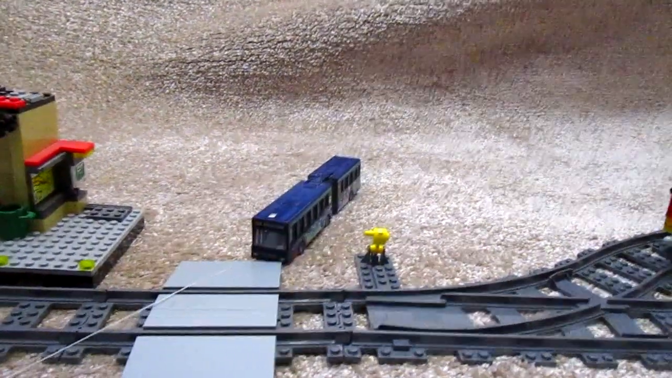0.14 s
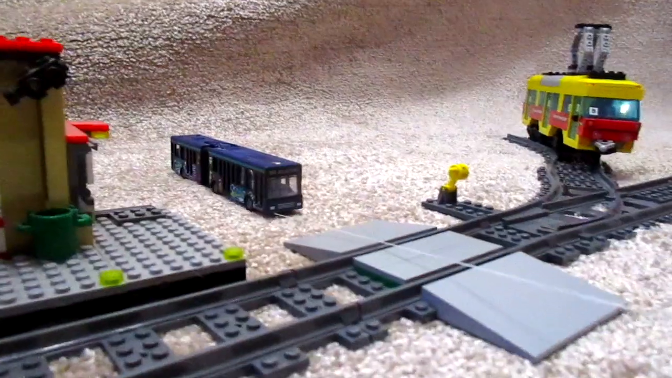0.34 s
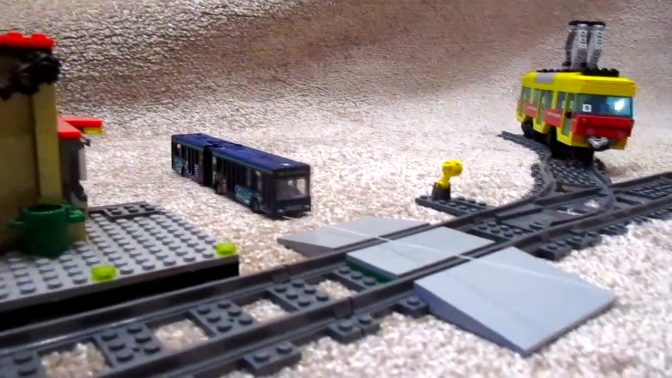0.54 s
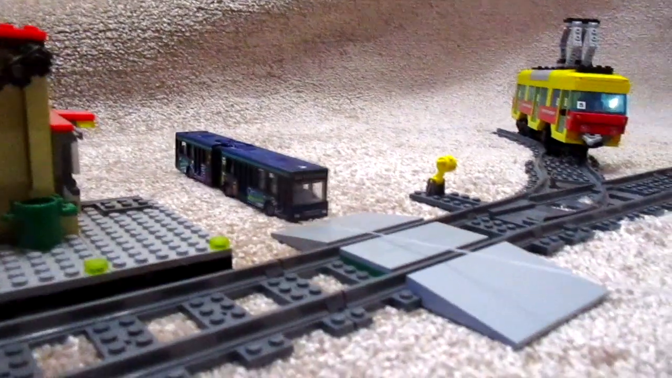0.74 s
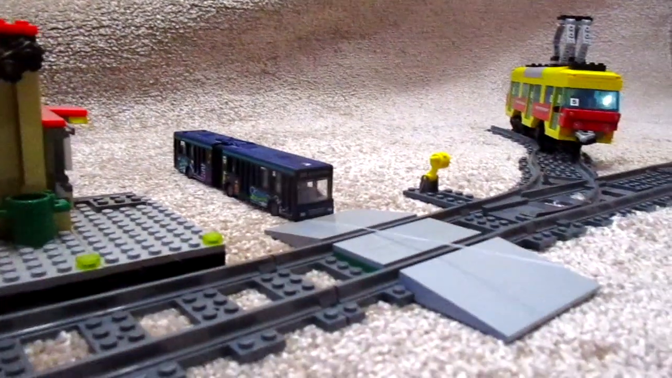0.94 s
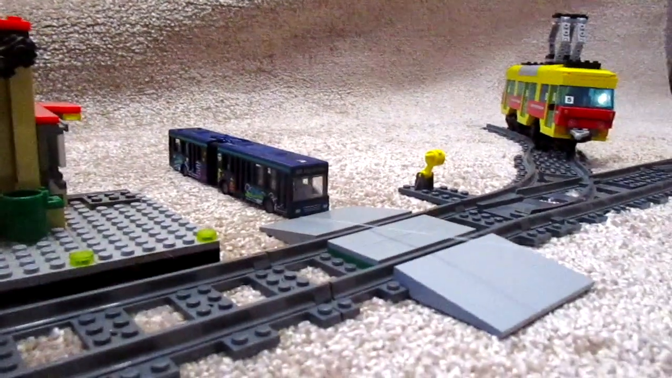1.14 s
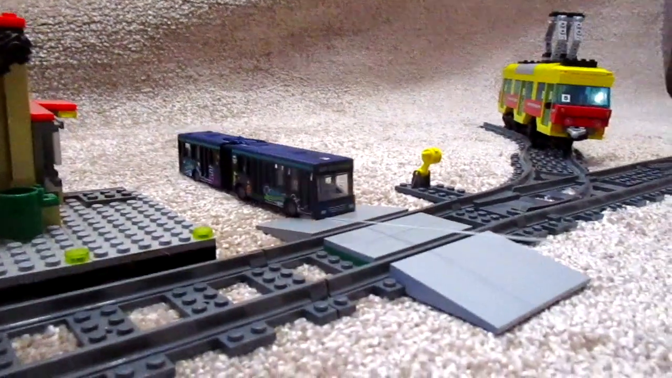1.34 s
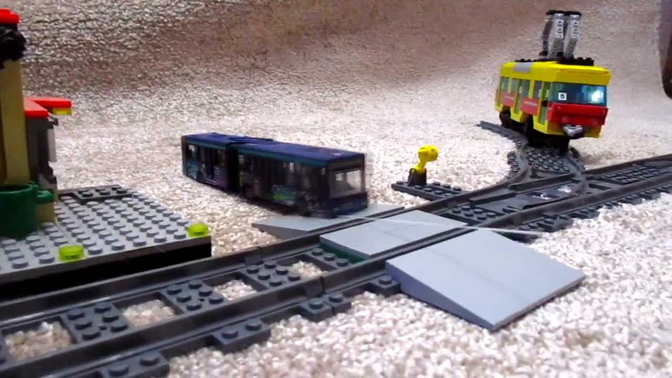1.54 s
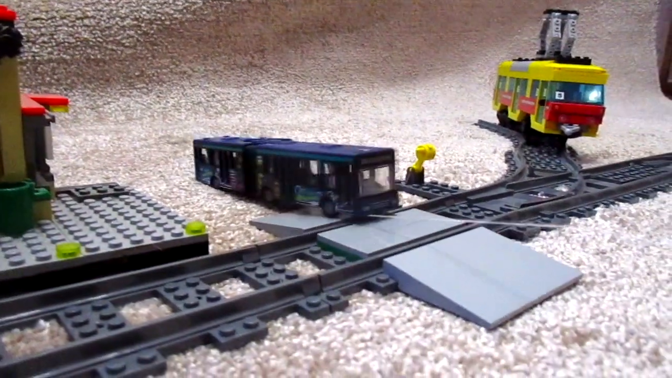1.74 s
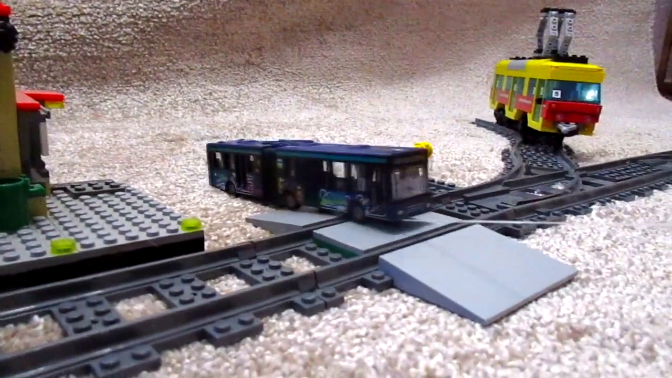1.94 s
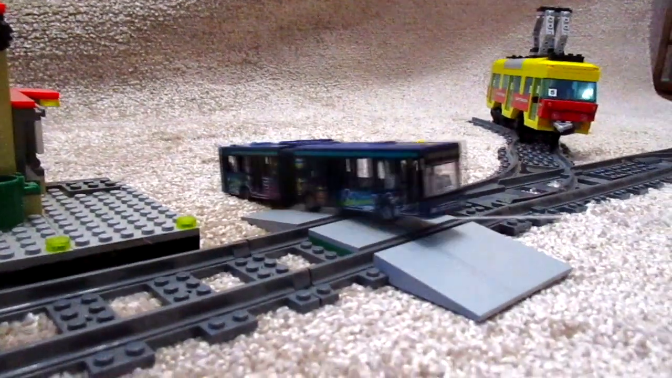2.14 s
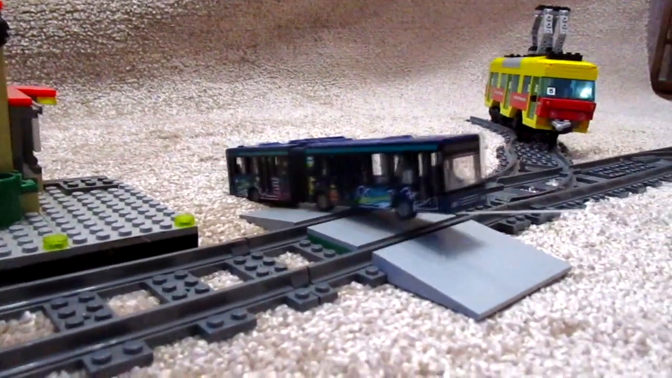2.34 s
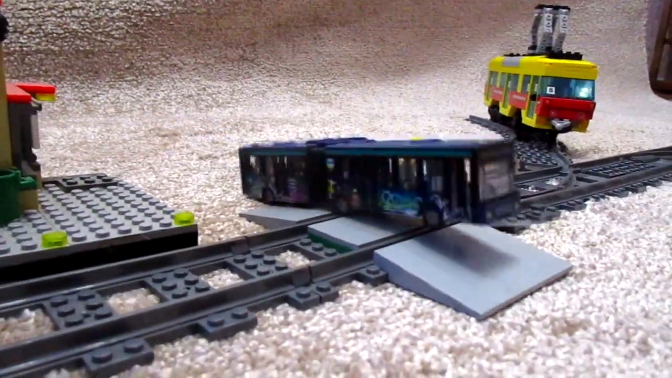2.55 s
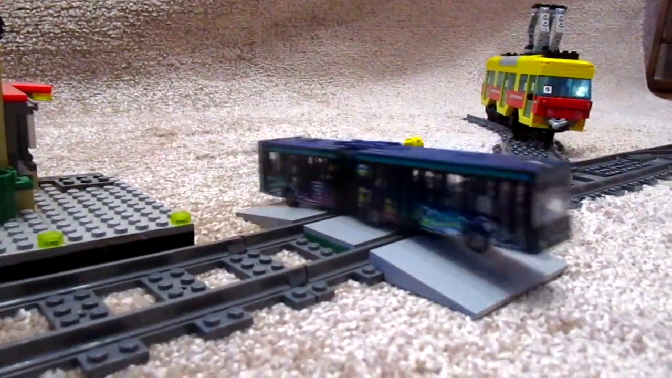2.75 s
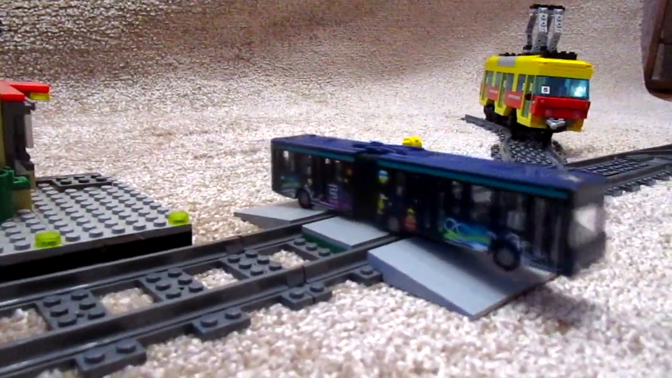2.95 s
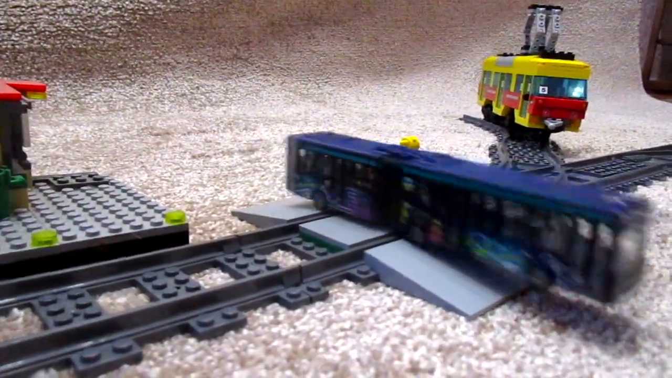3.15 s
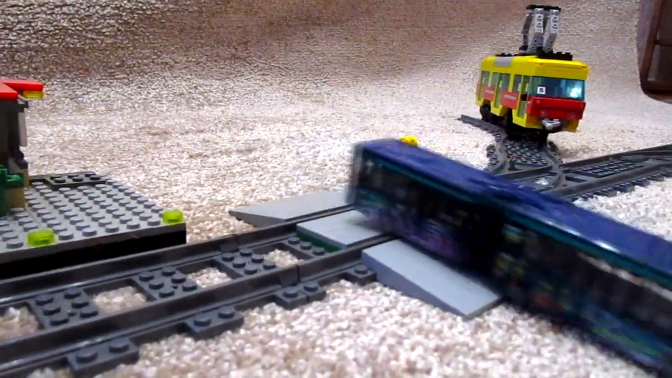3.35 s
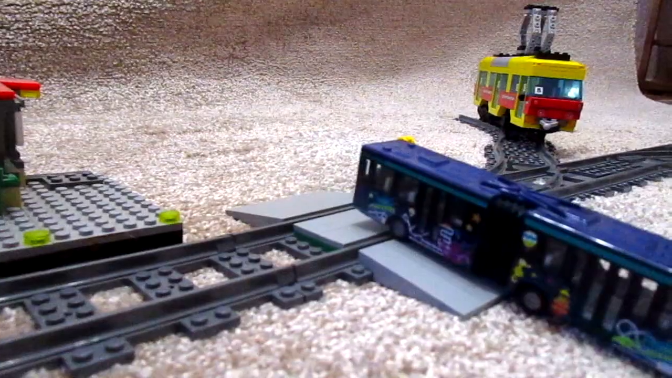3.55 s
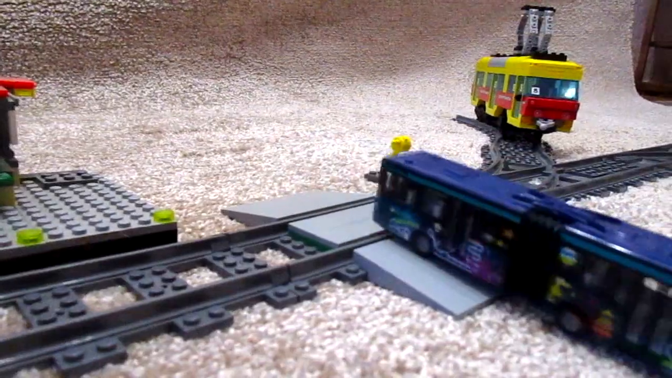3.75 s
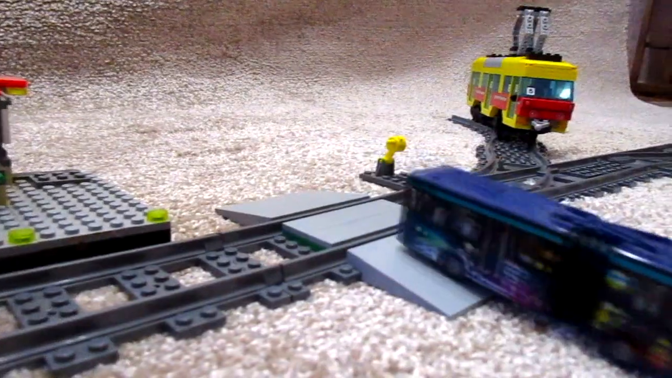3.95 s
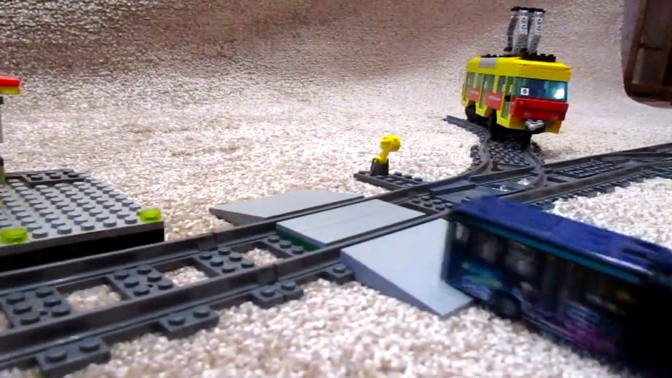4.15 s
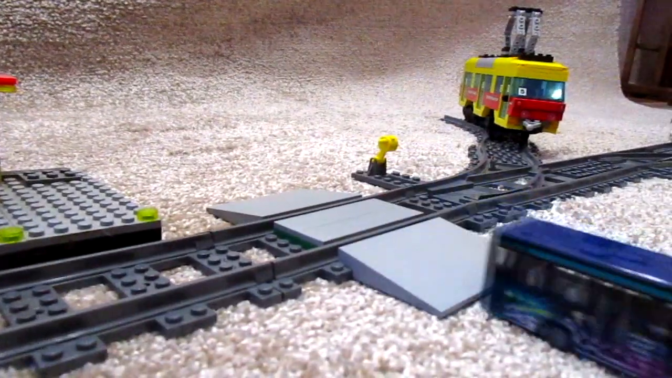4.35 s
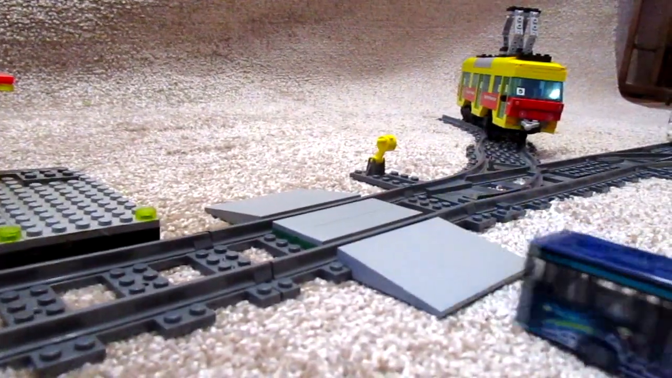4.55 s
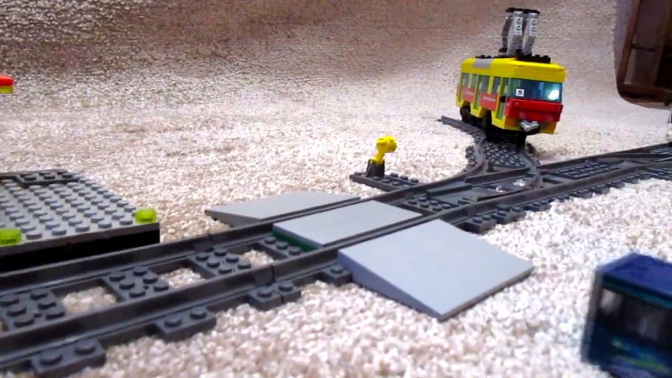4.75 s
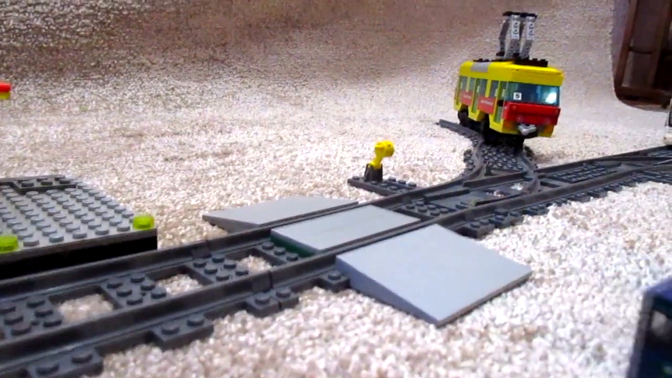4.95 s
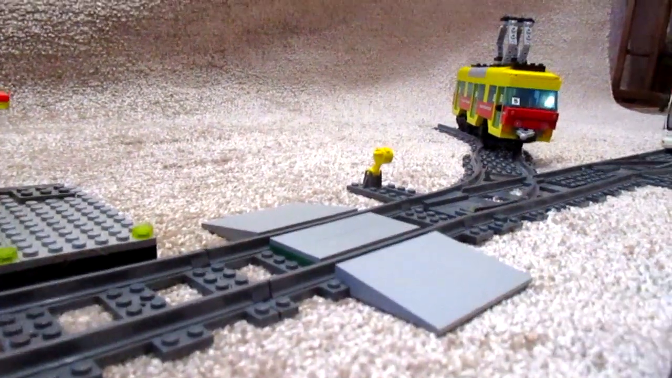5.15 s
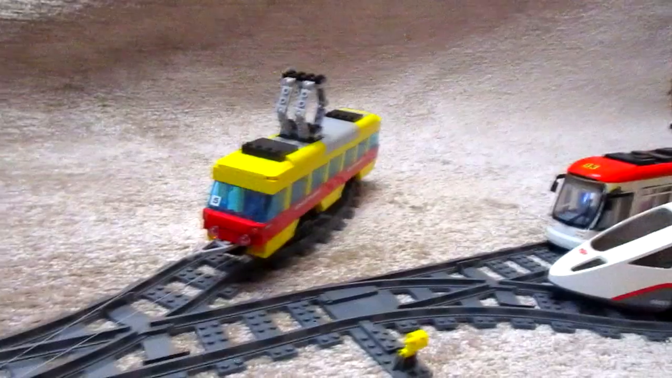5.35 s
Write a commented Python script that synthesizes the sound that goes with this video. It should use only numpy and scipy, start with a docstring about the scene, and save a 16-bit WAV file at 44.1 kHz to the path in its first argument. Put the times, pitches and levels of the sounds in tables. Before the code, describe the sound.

A tiny blip of hiss is followed by complete silence from about 0.04 to 0.38 s, then quiet steady camera hiss with a faint whirr and thin high whine returns abruptly. Very light plastic ticks and a weak scuff occur at 0.5 and 0.9 s; a soft dragging rattle comes at 1.2-1.35 s. A crisp little clack sounds near 1.9 s with a short scuff. From 2.5 to 2.8 s a toy bus clatters over the crossing in uneven hard-plastic clicks with muffled low thumps. A brighter, strong click hits at 3.04 s, then a dense rattle with rubbing and dull track booms at 3.2-3.4 s. Faint scuffs follow until 4 s. The loudest sharp, hollow clack lands at 4.1 s, with soft knocks and scrapes around 4.3 s and faint taps at 4.5-4.6 s. Hiss continues until a sudden cut to silence at 5.17 s. Small room, short reflections, close microphone.

```python
"""Hard plastic clicks, short scuffs and soft thumps over a quiet hiss, with two stretches of silence.
A plastic toy bus is pulled over a toy level crossing on a carpet: each contact is a rattle of tiny random
blows that rings the body, dragging tyres excite the same body with dense slips, and pushes and soft noise
make the track plate boom. A small camera close by adds shaped noise: a hiss, narrow whirrs and a thin whine.
"""
import sys
import numpy as np
from scipy import signal
from scipy.fft import rfft, irfft, next_fast_len
from scipy.io import wavfile
from scipy.ndimage import map_coordinates

SR = 44100
rng = np.random.default_rng(int(sys.argv[2]) if len(sys.argv) > 2 else 0)


def unload_audio(sound):
    """Save the sound as a 16-bit wav file, at the path given as the first command line argument."""
    columns = np.transpose(np.atleast_2d(sound))
    # keep every value between -1 and 1, then stretch to whole-number steps
    steps = np.round(np.clip(columns, -1, 1) * 32767)
    wavfile.write(sys.argv[1], SR, steps.astype(np.int16))


N = 238747
HISS_TOP_HZ = 15770  # the hiss stops here, and the microphone is weak above

# resonances of the bus body: [f/Hz, width/Hz, level/dB]
BODY_MODES = [(800, 250, -13), (1130, 90, -2), (1360, 90, -2), (1478, 70, -1), (1747, 65, 0),
              (1990, 90, -4), (2165, 70, 0), (2460, 150, -4), (3000, 350, -9), (3310, 170, -4),
              (3470, 170, 0), (3980, 200, -6), (4450, 400, -11), (5450, 350, 0), (5900, 400, -5),
              (6450, 400, -2), (7200, 400, 0), (7750, 450, -2), (8500, 600, -5), (9400, 700, 0),
              (10300, 700, 0), (11700, 1000, -2), (13300, 1600, -7), (15100, 1500, -14)]
# resonances of the track plate on the carpet: [f/Hz, width/Hz, level/dB]
PLATE_MODES = [(95, 8.3, 0.5), (140, 25.7, -0.5), (174.5, 40, -3), (250, 30, 2.5), (317.5, 76, 1),
               (480, 130, -1), (600, 77, -1)]


def clicks():
    """Each contact is a short rattle of tiny blows into four groups of body panels; hard ones reach higher."""
    # contacts: [t/s, level of the struck panels over 5 ms/dB, struck panel f/Hz,
    # focus: how far the other of the two low groups lies below/dB, hardness: treble over that level/dB,
    # time for the rattle to fade to 37 %/s]
    contacts = [(0.508, -48.5, 1460, 5.5, -8, 0.0099), (0.887, -41.5, 1180, 9, -4.5, 0.0028),
                (1.22, -47, 1180, 10, -18, .006), (1.283, -42, 2300, 17, -10, 0.0019),
                (1.289, -39.5, 2450, 30, -13, 0.0046), (1.296, -39, 1660, 14, -15, 0.013),
                (1.322, -38, 2420, 16, -10.5, 0.013), (1.701, -47.5, 1120, 2.5, -7.5, .0022),
                (1.871, -35.5, 3300, 8, -15, 0.0026), (1.876, -32, 3900, 2.5, -0.1, 0.0051),
                (1.9, -36, 1350, 6, -.6, .0035), (1.9061, -35, 2490, 4.5, 4, 0.0043),
                (2.062, -49, 1160, 6, -4, .0033), (2.5, -35, 3960, 3, 1.3, 0.0018),
                (2.508, -42, 2150, 2, -9, 0.0025), (2.519, -45, 2160, 6, 1, 0.0023),
                (2.538, -33.5, 2440, 1, -0.5, 0.0012), (2.542, -28, 2450, 14, -6, 0.0019),
                (2.564, -46.5, 2400, 9, 2, 0.0035), (2.592, -40.5, 1140, 6, -9, 0.0048),
                (2.6, -44.5, 1800, -1.5, 1, 0.002), (2.669, -52.5, 2700, 1, -16, .0023),
                (2.698, -47, 1710, 8, -31, .0032), (2.704, -39.5, 1490, 3.5, -24, 0.0057),
                (2.726, -45.5, 2080, 3, -3.5, 0.0026), (2.774, -52.5, 1490, 1, -3, 0.0022),
                (2.955, -38.5, 2750, 2.5, -6, 0.0015), (2.977, -56, 1430, 11, 4, .0025),
                (2.996, -45, 1120, 1.5, 0, .0025), (3.043, -41.5, 3000, 11.5, -23, 0.0014),
                (3.044, -23, 3450, 9.5, -8.5, 0.0021), (3.075, -48, 2360, 5, -1, 0.006),
                (3.181, -42.5, 2370, 1, 4.5, 0.0043), (3.195, -34.5, 2540, 8.5, 1, 0.0042),
                (3.205, -29, 1480, 4, -0.2, 0.0014), (3.218, -37.5, 2150, 12, -7, .006),
                (3.268, -45.5, 4000, -2, -5, 0.0033), (3.291, -42, 2390, 7, -2.5, .0033),
                (3.315, -46.5, 1580, 0, -4, 0.0025), (3.341, -40, 1780, 9.5, -15, 0.0018),
                (3.3523, -25, 1500, -0.5, 2, 0.0018), (3.362, -31.5, 3230, 6, -5.5, 0.002),
                (3.3731, -28, 3370, 1.5, 0.7, 0.0032), (3.866, -50.5, 1580, 7, -25.5, 0.0039),
                (3.915, -50, 1430, 7.5, -18, 0.0072), (4.093, -32.5, 1380, 8.5, -16, 0.0018),
                (4.0967, -17, 1820, 15, -2.5, 0.0036), (4.1006, -18.5, 2130, 18, -20.5, 0.00091),
                (4.103, -24.5, 1750, 13.5, -11, 0.0019), (4.112, -43.5, 1800, 3.6, 17, 0.0069),
                (4.24, -49.5, 2080, 8, -4.5, 0.0062), (4.274, -38.5, 1130, 14.5, -14, 0.0085),
                (4.318, -38, 1100, 10, -19, 0.0086), (4.501, -45.5, 1270, 7, -13, 0.065),
                (4.618, -55, 1600, 8, -11, 0.0029)]
    # borders between the lower, upper, treble and top panels: [f/Hz]
    borders = (2800, 4800, 9000)
    top_db = -6  # top panels compared with the treble panels
    damping = 1.23  # resonances are this much wider, as the body rests on its wheels

    out = np.zeros(N + SR)
    t = np.arange(SR // 10) / SR
    group = np.searchsorted(borders, np.array(BODY_MODES)[:, 0])
    damped = np.array(BODY_MODES) * [1, damping, 1]
    for start_s, db, hz, focus_db, hard_db, fade_s in contacts:
        struck = np.searchsorted(borders, hz)
        uneven = amp(3.7 * rng.standard_normal(len(t)))
        blows = rng.standard_normal(len(t)) * uneven * np.exp(-t / fade_s)
        # every contact touches the panels a little differently
        touched = alternate(BODY_MODES) * amp(rng.normal(0, 2, len(BODY_MODES)))
        near = np.where(group == struck, nearness(BODY_MODES, hz, depth_db=12), 1)
        lower_db = -focus_db * (struck != 0)
        upper_db = -focus_db * (struck == 0)
        levels = db + np.array([lower_db, upper_db, hard_db, hard_db + top_db])
        click = np.zeros(len(t))
        for k, group_db in enumerate(levels):
            ringing = filtered(blows, modes(damped, touched * near * (group == k)))
            click += burst(ringing, group_db)
        add(out, start_s, click, wet_db=-10.5)
    return out[:N]


def thumps():
    """A soft push on the track plate makes it boom briefly."""
    # thumps: [t/s, peak level before a common lift/dB, strongest f/Hz]
    pushes = [(0.89, -42.5, 338), (0.905, -43, 250), (1.283, -50, 600), (1.876, -48, 385),
              (1.885, -39.5, 182), (1.912, -45, 200), (2.502, -36.5, 388), (2.513, -37.5, 159.4),
              (2.6, -45, 275), (2.708, -47.5, 283), (2.739, -42, 143), (2.961, -40, 160),
              (2.998, -43.5, 275), (3.055, -50, 298), (3.076, -40, 165), (3.189, -40.5, 119),
              (3.21, -40, 314), (3.222, -40.5, 154), (3.27, -38.5, 130), (3.311, -40.5, 124),
              (3.352, -35, 304), (3.36, -36, 165), (3.377, -37, 95), (3.399, -45.5, 174),
              (4.0955, -32, 498), (4.113, -44, 95), (4.28, -43.5, 140), (4.331, -44.5, 203)]
    lift_db = 1.0

    out = np.zeros(N + SR)
    t = np.arange(SR // 8) / SR
    for start_s, db, hz in pushes:
        push = rng.choice([-1, 1]) * t * np.exp(-t * hz * 6)  # a sharper push for a higher note
        gains = alternate(PLATE_MODES) * nearness(PLATE_MODES, hz, depth_db=11.5)
        boom = peak(filtered(push, modes(PLATE_MODES, gains)))
        add(out, start_s, amp(db + lift_db) * boom, wet_db=-1)
    return out[:N]


def scuff():
    """Dense small slips of the tyres excite the body near one panel, and a little the top note of the plate."""
    # drags: [start t/s, length before letting go/s (at least the swell), body level/dB, most excited panel f/Hz]
    drags = [(0.493, 0.052, -60, 1460), (1.018, 0.061, -66, 1500), (1.199, 0.15, -54, 2210),
             (1.488, .05, -55, 2000), (1.928, 0.16, -57.5, 1720), (2.66, 0.071, -53, 1650),
             (3.228, 0.11, -48, 1900), (3.402, 0.18, -56, 1546), (3.673, 0.11, -62.5, 1690),
             (3.815, 0.22, -60, 1680), (4.233, .03, -58, 2000), (4.264, 0.059, -49, 2300),
             (4.494, 0.053, -60.5, 1680)]
    swell_s, fade_s = 0.04, 0.06
    edge_db = -11.5  # a drag starts and ends this far below its full level

    slips = rng.standard_normal(N) * amp(5 * rng.standard_normal(N))
    # the strength also wavers smoothly, through 120 random points a second
    waver_db = 2.2 * map_coordinates(rng.standard_normal(1000), [np.arange(N) * 120 / SR])
    slips = slips * amp(waver_db)
    # rubber barely reaches the treble panels
    octaves_up = np.maximum(np.log2(np.array(BODY_MODES)[:, 0] / 2200), 0)
    tilt = alternate(BODY_MODES) * amp(-7 * octaves_up)
    out = np.zeros(N)
    for start_s, length_s, db, hz in drags:
        full_s = start_s + swell_s
        release_s = start_s + max(length_s, swell_s)
        end_s = release_s + fade_s
        rows = [(start_s, db + edge_db), (full_s, db), (release_s, db), (end_s, db + edge_db)]
        span = slice(round(start_s * SR), round(end_s * SR))
        gains = tilt * nearness(BODY_MODES, hz, depth_db=4.0)
        body = unit(filtered(slips[span], modes(BODY_MODES, gains)))
        plate = unit(filtered(slips[span], modes(PLATE_MODES[-1:], [1])))
        out[span] += level(rows)[span] * (body + amp(-10.5) * plate)
    return out


def rumble():
    """The plate booms softly on the carpet while the bus rocks over it: noise through the plate resonances."""
    # loudness over time: [t/s, level before a common lift/dB]
    loudness = [(2.4, -75), (2.684, -59.5), (2.816, -75), (3.01, -63), (3.212, -68), (3.6, -66.5)]
    lift_db = 2.5

    boom = filtered(rng.standard_normal(N), modes(PLATE_MODES, alternate(PLATE_MODES)))
    return amp(lift_db) * level(loudness) * unit(boom)


def camera():
    """Steady shaped noise for the hiss, and narrow bands of noise for the whirr and a thin whine."""
    # colour of the hiss: [f/Hz, relative level per Hz/dB]
    hiss_colour = [(12, -47), (20, -14.5), (44, 1), (254, -8.5), (318, -10), (398, -11.5), (715, -23.5),
                   (870, -6.5), (1120, -18.5), (3230, -22.5), (4780, -33), (5810, -26), (8130, -26.5),
                   (15900, -38.5)]
    # whirr of the camera: [f/Hz, width/Hz, level/dB]
    whirr = [(903, 17, -68), (3130, 73, -82), (12760, 90, -88)]
    # one thin whine: (f/Hz, width/Hz, level/dB)
    whine = (7865, 45, -74)
    hiss_db = -52

    colour = lambda f: amp(along(hiss_colour, f)) * (f < HISS_TOP_HZ)
    out = amp(hiss_db) * unit(filtered(rng.standard_normal(N), colour))
    for hz, width, db in whirr + [whine]:
        bell = lambda f: np.exp(-((f - hz) / width) ** 2)
        out += amp(db) * unit(filtered(rng.standard_normal(N), bell))
    return out


def tail():
    """A fresh room answer of energy 1: noise in which each frequency dies at its own speed."""
    # time to fall by 60 dB: [f/Hz, fall time/s]
    fall_times = [(100, 0.13), (1000, 0.27), (2000, 0.23), (3300, 0.15), (6000, .2), (14000, 0.13)]
    hz, t, bands = signal.stft(rng.standard_normal(SR // 4), SR, nperseg=256)
    decay = amp(-60 * t / along(fall_times, hz)[:, None])
    x = signal.istft(bands * decay, SR, nperseg=256)[1]
    return x / np.linalg.norm(x)


def add(out, s, dry, wet_db):
    """Places a sound and, 150 samples later, the start of the room's answer to it."""
    wet = signal.fftconvolve(dry, np.pad(tail(), (150, 0)))
    start = round(s * SR)
    out[start:start + len(dry)] += dry
    out[start:start + len(wet)] += amp(wet_db) * wet


def modes(table, gains):
    """Response of a sum of resonances, each with its own gain; none rings before it is struck."""
    def response(f):
        total = 0
        for (hz, width, db), gain in zip(table, gains):
            total = total + gain * amp(db) * 1j * f * width / (hz * hz - f * f + 1j * f * width)
        return total
    return response


def alternate(table):
    """Signs that put neighbouring resonances in opposite phase."""
    return (-1.) ** np.arange(len(table))


def nearness(table, hz, depth_db):
    """The resonance at hz speaks loudest; others drop with distance, by depth_db from 0.27 octave on."""
    octaves = np.abs(np.log2(np.array(table)[:, 0] / hz))
    return amp(-depth_db * np.minimum(octaves / 0.27, 1))


def filtered(x, response):
    """x shaped by a response that depends on frequency."""
    m = next_fast_len(len(x) + 8192)  # spare silence keeps the ringing from wrapping round
    return irfft(rfft(x, m) * response(np.fft.rfftfreq(m, 1 / SR)), m)[:len(x)]


def along(points, hz):
    """Reads a value between (f/Hz, value) points on a log frequency axis."""
    f, v = np.transpose(points)
    return np.interp(np.log(hz + 1), np.log(f + 1), v)


def level(rows):
    """Gain per sample from (t/s, level/dB) rows, practically silent outside them."""
    s, db = np.transpose(rows)
    return amp(np.interp(np.arange(N) / SR, s, db, left=-150, right=-150))


def burst(x, db):
    """A short sound scaled so that its energy is that of 5 ms at this rms level."""
    return amp(db) * x * np.sqrt(.005 * SR) / np.linalg.norm(x)


def amp(db):
    """Decibels to a plain factor."""
    return 10 ** (np.asarray(db) / 20)


def unit(x):
    """Scaled to rms 1."""
    return x / np.sqrt(np.mean(x ** 2) + 1e-20)


def peak(x):
    """Scaled to peak 1."""
    return x / np.abs(x).max()


def scene():
    """Bus, track and camera together, as one channel."""
    return (clicks() + thumps() + scuff() + rumble() + camera())[None]


def record(dry):
    """The microphone port dips one band, an edit mutes two stretches, and the extreme treble is cut."""
    # dip of the microphone port: (f/Hz, width/Hz, level/dB)
    hz, width, dip_db = (4800, 650, -9)
    # stretches with sound: [from t/s, to t/s, level/dB]
    open_parts = [(0, .0425, -3), (.3822, 5.1725, 0)]
    top_hz, edge_loss_db = 16650, -11  # nothing above top_hz; weaker from HISS_TOP_HZ up to it
    ramp_s = .001

    def port(f):
        away = hz * hz - f * f
        return (away + 1j * f * width * amp(dip_db)) / (away + 1j * f * width)

    def treble_end(f):
        edge = amp(edge_loss_db * (f > HISS_TOP_HZ))
        return edge * np.clip((top_hz - f) / 150, 0, 1) ** 2

    t = np.arange(N) / SR
    gate = np.zeros(N)
    for start_s, end_s, db in open_parts:
        since_start = t - start_s + ramp_s * (start_s == 0)  # no fade-in at the very beginning
        gate += amp(db) * np.clip(np.minimum(since_start, end_s - t) / ramp_s, 0, 1)
    return filtered(gate * filtered(dry[0], port), treble_end)[None]


dry = scene()
out = record(dry)
unload_audio(out)
```